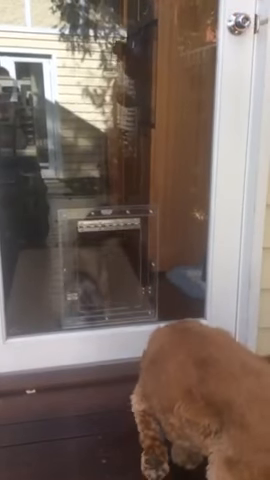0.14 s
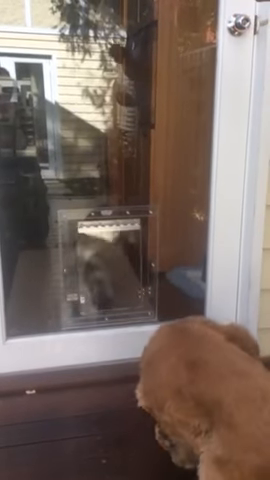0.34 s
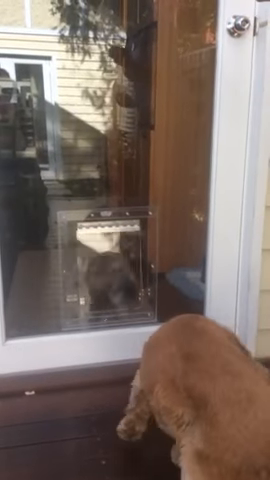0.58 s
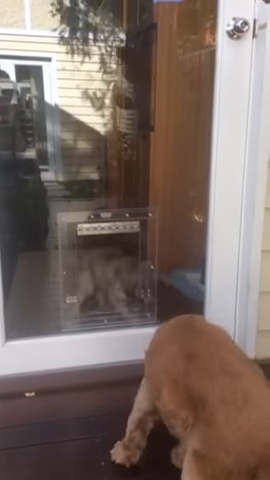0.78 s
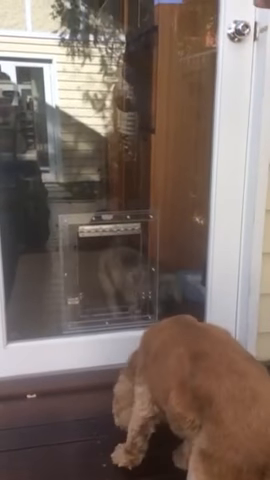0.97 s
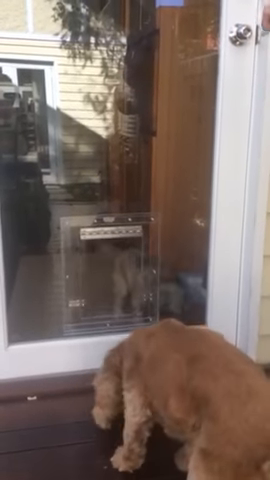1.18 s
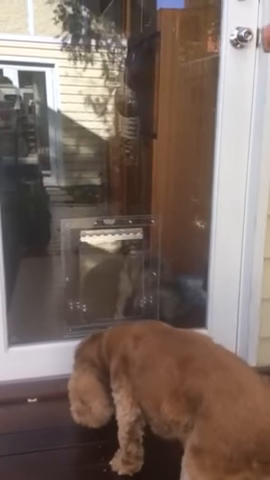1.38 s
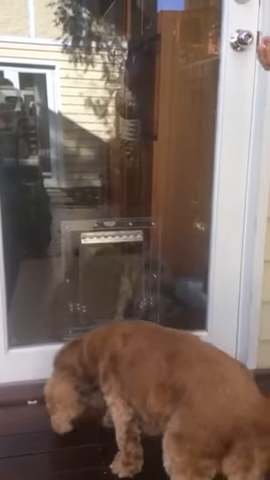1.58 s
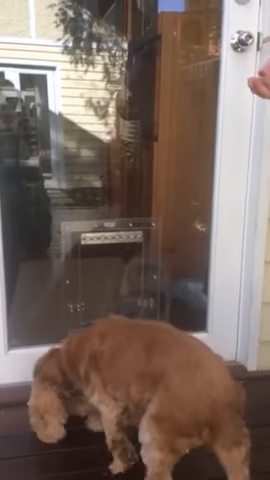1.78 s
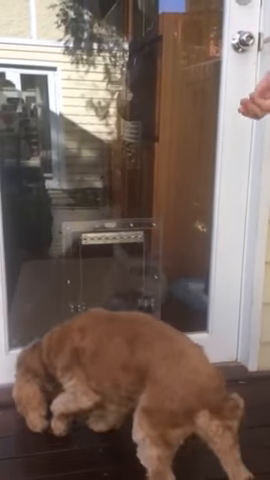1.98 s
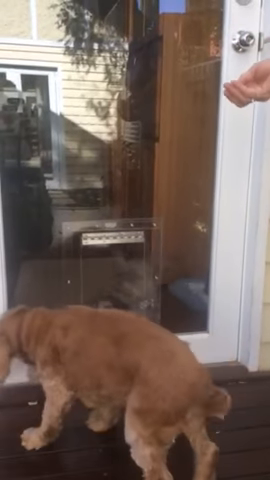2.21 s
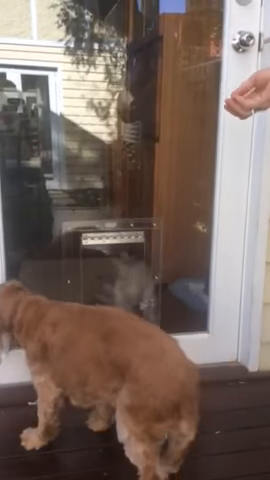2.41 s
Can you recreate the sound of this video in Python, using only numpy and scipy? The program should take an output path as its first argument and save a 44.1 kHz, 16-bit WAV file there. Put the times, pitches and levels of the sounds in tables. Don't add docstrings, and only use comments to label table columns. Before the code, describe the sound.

A plastic pet flap slams and rattles in its frame, then small clicks and paw steps

```python
import sys
import numpy as np
from scipy import signal
from scipy.io import wavfile
from scipy.ndimage import uniform_filter1d

SR = 44100
rng = np.random.default_rng(int(sys.argv[2]) if len(sys.argv) > 2 else 0)


def generate_wav(signal):
    frames = np.transpose(np.atleast_2d(signal))
    scaled = np.clip(frames, -1, 1) * 32767
    pcm = np.round(scaled).astype(np.int16)
    wavfile.write(sys.argv[1], SR, pcm)


def elevation(decibels):
    levels = np.asarray(decibels, float)
    return 10 ** (levels / 20)


N = 108045
T = np.arange(N) / SR


def set_rms(x, db):
    return x * elevation(db) / np.sqrt(np.mean(x ** 2))


def resonate(x, hz, width_hz):
    hz = min(hz, 0.45 * SR)
    return signal.lfilter(*signal.iirpeak(hz, hz / width_hz, fs=SR), x)


def noise_band(count, hz, width_hz):
    return resonate(rng.standard_normal(count), hz, width_hz)


def soften(x, top_hz):
    return signal.lfilter(*signal.butter(2, min(top_hz, 0.45 * SR), fs=SR), x)


def chatter(start_s, rise_s, decay_s):
    grain_db = 1
    age_s = np.clip(T - start_s, 0, None)
    grit = rng.standard_normal(N) * elevation(grain_db * rng.standard_normal(N))
    rise = np.clip(age_s / rise_s, 0, 1)
    fall = np.exp(-np.clip(age_s - rise_s, 0, None) / decay_s)
    return grit * rise * fall


def ring(push, modes, crack_db):
    out = elevation(crack_db) * push
    for hz, width_hz, db in modes:
        out = out + elevation(db) * np.sqrt(4000 / width_hz) * resonate(push, hz, width_hz)
    return out / 2


def curve(table, hz):
    table_hz, value = np.array(table).T
    return np.interp(np.log(hz), np.log(table_hz), value)


def drift(rate_hz):
    hold = int(SR / rate_hz)
    steps = np.repeat(rng.standard_normal(N // hold + 1), hold)
    return 0.78 * uniform_filter1d(uniform_filter1d(steps, hold), hold)[:N]


def air():
    # (frequency [Hz], density [dB per Hz])
    spectrum = [(15, -47), (25, -7), (70, -2), (416, -12.5), (988, -13.5), (1940, -17.5), (2690, -16.5),
                (14800, -29.5), (16000, -25)]
    # (frequency [Hz], width [Hz], level [dB])
    drone = (72, 17, -66.5)
    air_db, swell_db, flicker_db = -58, -1.2, 0.42
    swell = drift(1.9)
    out = 0
    for hz in 30 * 2 ** np.arange(0, 9.2, 1 / 3):
        noise = resonate(noise_band(N, hz, hz / 3), hz, hz / 3)
        gain_db = curve(spectrum, hz) + swell_db * swell + flicker_db * drift(8.64)
        out = out + elevation(gain_db) * noise
    drone_hz, width_hz, drone_db = drone
    return set_rms(out, air_db) + set_rms(noise_band(N, drone_hz, width_hz), drone_db)


def room(x):
    # (frequency [Hz], 60 dB decay time [s])
    t60 = [(70, 0.88), (250, 0.46), (1000, 0.5), (4000, 0.27), (12000, 0.4)]
    gap_s = 0.0068
    age_s = T[:SR]
    tail = 0
    for hz in 50 * 2 ** np.arange(0, 8.6, 0.5):
        noise = resonate(noise_band(SR, hz, hz / 2), hz, hz / 2)
        tail = tail + noise * elevation(-60 * age_s / curve(t60, hz))
    tail = tail * np.clip(age_s / gap_s - 1, 0, 1)
    return signal.fftconvolve(x, tail / np.sqrt(np.sum(tail ** 2)))[:N]


def dog():
    # (time [s], level [dB], board frequency [Hz], decay [s])
    thuds = [(0.583, -53, 200, 0.015), (0.663, -55, 785, 0.024), (0.899, -57.5, 200, 0.031),
             (0.993, -61, 1110, 0.057), (1.107, -50.5, 150, .02), (1.306, -54, 154, 0.028),
             (1.334, -51.5, 330, 0.016), (1.508, -58.5, 110, 0.022), (1.784, -54, 900, 0.017),
             (1.855, -51, 200, 0.013), (2.195, -53, 350, .025)]
    # (time [s], level [dB], centre [Hz], length [s])
    strokes = [(0.633, -60.5, 3750, .03), (0.907, -65, 9000, 0.013), (1.243, -66.5, 9000, 0.023),
               (1.438, -62, 5000, 0.021), (1.796, -73, 2000, 0.0093), (2.13, -63, 5000, 0.038),
               (2.209, -58, 4000, 0.047), (2.445, -70, 7000, 0.018)]
    rise_s = 0.0027
    out = 0
    for start_s, db, hz, decay_s in thuds:
        envelope = np.clip((T - start_s) / rise_s, 0, 1) * np.exp(-np.clip(T - start_s, 0, None) / decay_s)
        out = out + set_rms(noise_band(N, hz, hz / 2.3), db) * envelope
    for centre_s, db, hz, length_s in strokes:
        envelope = np.exp(-((T - centre_s) / length_s) ** 2)
        out = out + set_rms(noise_band(N, hz, hz), db) * envelope
    return out


def ticks():
    # (time [s], level [dB], rise [s], chatter decay [s], object index)
    events = [
        (.657, -42, 0.0063, 0.0053, 4),
        (0.751, -41.5, .005, 0.019, 1),
        (1.399, -49, 0.0083, 0.018, 3),
        (1.53, -58, .01, .02, 3),
        (1.558, -42.5, 0.0052, 0.0085, 3),
        (1.885, -36, 0.00083, 0.0066, 0),
        (1.891, -42.5, 0.0025, 0.003, 0.5),
        (1.91, -49.5, 0.0043, 0.0099, 0),
        (2.180, -38.5, 0.00036, 0.0053, 2),
        (2.2, -57, .008, .02, 4),
    ]
    # (frequency [Hz], width [Hz], level [dB])
    claw = [(900, 390, -12), (1865, 200, -6), (2520, 730, -4.5), (3210, 87, 5.5), (3810, 180, 3.5),
            (4770, 200, -3), (6000, 300, 0), (7300, 650, -18), (4470, 6900, -2)]
    catch = [(806, 48, 0), (900, 180, -3), (1720, 290, -1.5), (2200, 140, -3.5), (2490, 130, 4),
             (3360, 500, -1), (4020, 180, -6), (4920, 1700, -11.5)]
    board = [(840, 59, 3.5), (1240, 100, 5.5), (2020, 450, -4.5), (4100, 680, 3.5), (7100, 960, -4),
             (5000, 6000, -8)]
    hinge = [(2573, 52, 2.5), (3800, 550, -8), (4700, 150, -3.5), (5900, 300, -6)]
    toe = [(800, 260, -8), (3230, 160, -1), (3700, 160, -3), (4600, 300, -0.5), (7000, 900, -4)]
    hardness_hz = [12800, 6000, 9000, 7000, 8000]
    knock_db, crack_db = 13, -14
    objects = (claw, catch, board, hinge, toe)
    out = 0
    for start_s, db, rise_s, decay_s, index in events:
        k = int(round(index))
        knock = np.arange(N) == int((start_s + rise_s) * SR)
        push = chatter(start_s, rise_s, decay_s) + elevation(knock_db) * knock
        out = out + elevation(db) * ring(soften(push, hardness_hz[k]), objects[k], crack_db)
    return out


def flap():
    # (time [s], level [dB], brightness [Hz], chatter decay [s])
    contacts = [(0.159, -48, 12000, 0.0048), (.189, -47, 12000, 0.0092), (0.2125, -30, 344, 0.0041),
                (.218, -30.5, 14300, 0.0077), (0.2227, -26.5, 12200, 0.0044), (0.228, -23.5, 3420, 0.0073),
                (0.2311, -27, 3080, 0.0047), (.239, -32, 8000, 0.0034), (0.249, -28, 900, 0.0037),
                (0.253, -32.5, 6000, 0.0059), (0.27, -34, 7000, 0.0088), (0.289, -35, 2840, 0.0093),
                (0.331, -45.5, 4050, 0.022), (.404, -48, 8000, 0.016)]
    # (frequency [Hz], width [Hz], level [dB])
    modes = [(76, 16, 0), (139, 35, -5), (201.7, 26, -0.5), (330, 65, -6.5), (428, 75, -4),
             (600, 150, -7.5), (706, 32, -9.5), (832, 22, -14), (1050, 63, -13), (1830, 660, -13),
             (2240, 240, -11.5), (2810, 320, -8.5), (4100, 2700, -14.5), (6200, 1600, -21)]
    rise_s, crack_db = 0.00052, 2
    panel_hz = 163
    hits = 0
    for start_s, db, top_hz, decay_s in contacts:
        push = soften(chatter(start_s, rise_s, decay_s), top_hz)
        hits = hits + elevation(db) * np.sqrt(1 + 6000 / top_hz) * push
    thin = signal.lfilter(*signal.butter(1, panel_hz, "high", fs=SR), hits)
    return ring(thin, modes, crack_db)


def scene():
    flap_room_db, small_room_db = -4, -12
    slam = flap()
    small = ticks() + dog()
    echoes = room(elevation(flap_room_db) * slam + elevation(small_room_db) * small)
    return (air() + echoes + small + slam)[None]


def roll_off(x):
    return signal.sosfilt(signal.butter(12, 16380, fs=SR, output="sos"), x)


def record(dry):
    bass_hz, top_hz, limit = 45, 15280, 0.12
    mic = signal.sosfilt(signal.butter(2, bass_hz, "high", fs=SR, output="sos"), dry)
    mic = limit * np.tanh(mic / limit)
    mic = signal.sosfilt(signal.ellip(10, 0.3, 40, top_hz, fs=SR, output="sos"), mic)
    return roll_off(mic)


dry = scene()
out = record(dry)
generate_wav(out)
```